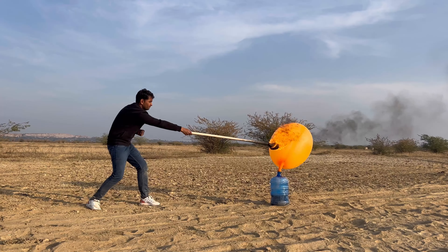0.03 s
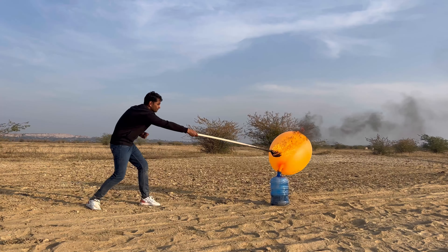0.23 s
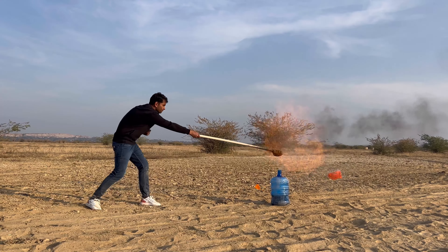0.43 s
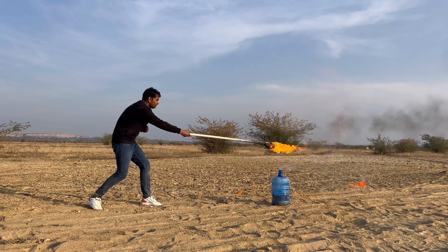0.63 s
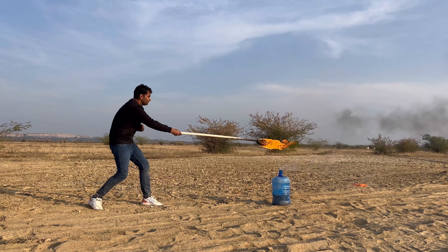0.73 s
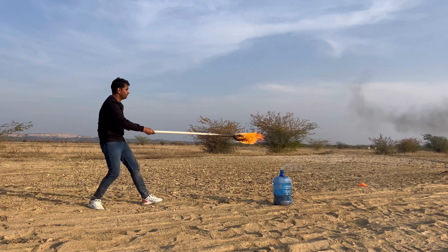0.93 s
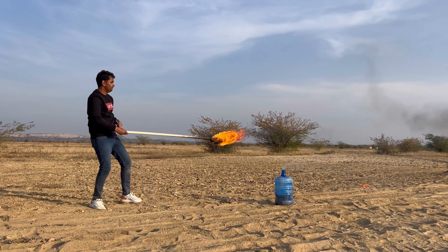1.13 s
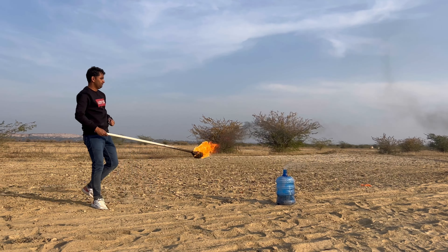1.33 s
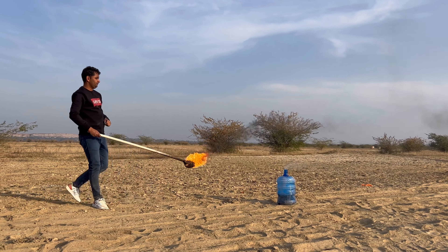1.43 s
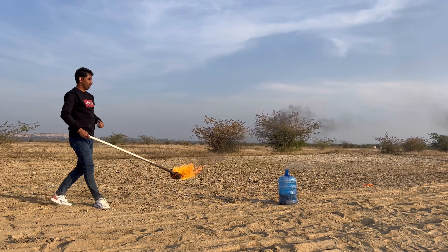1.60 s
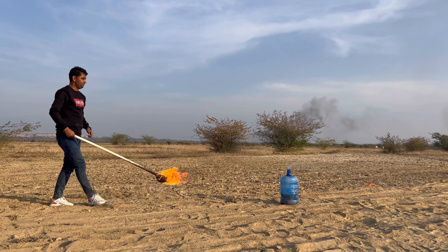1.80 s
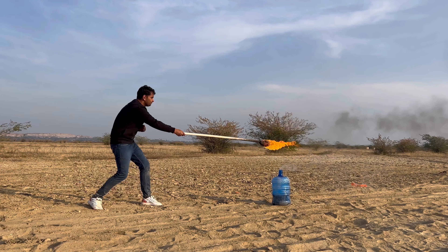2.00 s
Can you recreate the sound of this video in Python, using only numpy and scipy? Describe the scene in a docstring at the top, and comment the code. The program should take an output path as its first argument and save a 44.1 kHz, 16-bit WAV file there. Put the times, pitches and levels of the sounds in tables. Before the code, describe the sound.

A hydrogen balloon explodes with a sharp crack and short, deep boom in an open field, without echo. After a brief hush, a swung torch flame rushes and flaps, then stops, leaving low wind on the microphone.

```python
"""First comes the faint flutter of a torch flame on a pole in an open field. A quarter second in, it sets off a
hydrogen balloon: the bursting gas gives a ragged crack and the growing fireball a short, deep boom, with no
distant echo. After a brief hush the flame rushes and flaps as it is swung away, with a few dry ticks. At the
end, with a click, the scene changes to low wind."""
import sys
import numpy as np
from scipy import signal
from scipy.io import wavfile
from scipy.ndimage import uniform_filter1d, minimum_filter1d

SR = 44100
rng = np.random.default_rng(int(sys.argv[2]) if len(sys.argv) > 2 else 0)


def unload_audio(sound):
    """Save the sound as a 16-bit wav file, at the path given as the first command line argument."""
    columns = np.transpose(np.atleast_2d(sound))
    # keep every value between -1 and 1, then stretch to whole-number steps
    steps = np.round(np.clip(columns, -1, 1) * 32767)
    wavfile.write(sys.argv[1], SR, steps.astype(np.int16))


N = 90669
TIME = np.arange(N) / SR
BANG_S, FLAME_END_S = 0.252, 1.988

# How loud each layer of the flame is over time. Each row: time in seconds, level in dB.
RUMBLE_LEVEL = [(0, -43.5), (.1, -41), (.15, -50), (.24, -46), (.42, -45.5), (.5, -41), (.58, -28.5),
                (.82, -27.5), (.94, -36.5), (1.03, -30.5), (1.14, -30.5), (1.33, -28), (1.42, -33.5),
                (1.48, -45.5), (1.63, -33.5), (1.72, -42.5), (1.98, -41)]
ROAR_LEVEL = [(0, -53), (.22, -54), (.32, -52.5), (.4, -72.5), (.52, -65), (.62, -36.5), (.72, -45.5),
              (.95, -57.5), (1.04, -40.5), (1.14, -50), (1.27, -43), (1.335, -34), (1.42, -46.5),
              (1.52, -51.5), (1.63, -42), (1.73, -49.5), (1.82, -46), (1.98, -48.5)]
RUSH_LEVEL = [(0, -70), (.22, -61.5), (.28, -54.5), (.35, -78.5), (.48, -77.5), (.58, -54.5), (.63, -52.5),
              (1.35, -54), (1.55, -55), (1.98, -54.5)]
HISS_LEVEL = [(0, -104), (.24, -88), (.5, -85.5), (.58, -71.5), (.65, -65.5), (.97, -76.5), (1.12, -72),
              (1.38, -73), (1.7, -74.5), (1.95, -99)]
# The tone colour of each noise. Each row: frequency in Hz, relative strength there in dB.
RUMBLE_COLOUR = [(25, -25), (45, -0.5), (72, 2.5), (110, -1), (170, -11.5), (240, -15), (340, -38.5)]
ROAR_COLOUR = [(190, -1), (260, -1), (410, -6.5), (520, -19), (700, -26)]
RUSH_COLOUR = [(450, 0.5), (620, 0), (900, -2), (1400, -2.5), (1800, -17), (2250, -18.5), (2850, -20),
               (4500, -36.5)]
SIZZLE_COLOUR = [(10000, 0), (15500, 0)]
HISS_COLOUR = [(2500, -1), (3700, -2.5), (5500, -3.5), (7500, -14), (9500, -23), (15500, -22)]
AIR_COLOUR = [(2000, 6.5), (5000, -2.5), (15500, -9.5)]
CRACK_COLOUR = [(150, -0.5), (380, 2.5), (550, -11), (1100, -21.5), (1750, -19), (2700, -25), (4200, -21.5),
                (6300, -44), (7600, -27), (10000, -44.5), (15500, -38)]
SCATTER_COLOUR = [(100, 0.5), (380, -4.5), (600, -18), (1200, -30), (2200, -39), (4200, -45),
                  (15500, -53.5)]
PUFF_COLOUR = [(200, 12), (400, 1.5), (600, 4), (850, -6), (1150, -22.5), (1700, -27.5), (2400, -41)]
WIND_COLOUR = [(18, 8.5), (50, -10.5), (100, -33), (250, -31), (600, -49.5), (1800, -82.5)]
# How noise spreads between the ears. Each row: frequency in Hz, left minus right in dB,
# how alike the two sides are (1 means the same).
FLAME_STEREO = [(700, 0.5, 1), (900, 0, 0.98), (1340, 4.5, 0.35), (2270, -1.5, 0.39), (4400, 4, 0.75),
                (8000, 0.5, 0.41), (11000, 0, .05)]
CRACK_STEREO = [(500, 1, 1), (690, -6.5, 0.92), (1290, -3.5, 0.48), (2400, -0.5, 0.96), (4380, 3.5, 0.24),
                (8100, 0, 0.04), (15000, -1.5, 0.26)]
# Narrow bands that drone in the rush. Each row: low and high edge in Hz, dB relative to the rush.
DRONES = [(1214, 1393, -5.5), (2030, 2350, -16.5), (3420, 3850, -27)]
# Flame pops. Each row: time in seconds, pitch in Hz, level in dB, half-width in seconds.
POPS = [(0.2415, 890, -40.5, 0.0055), (1.0555, 390, -27.5, 0.0029), (1.0603, 786, -26, 0.0017),
        (1.0602, 1400, -43.5, 0.0011)]
# Shock waves of the bursting gas. Each row: start in seconds, level in dB, length in seconds.
SHOCKS = [(0.2544, -6.5, 0.0032), (0.2604, -9, 0.0049)]
# The hollow ring of the burst. Each row: pitch in Hz, level in dB.
RING_TONES = [(555, -20.5), (664, -23), (866, -24.5), (1004, -30.5), (1123, -21), (1385, -29),
              (1703, -23.5), (2126, -31), (2520, -34)]
# The boom's low tones. Each row: pitch in Hz, level in dB, then rise, hold and fade in seconds.
BOOM_TONES = [(83.2, -4.5, 0.028, 0.061, 0.056), (180.5, -12, 0.014, 0.041, 0.075),
              (231.8, -14.5, 0.014, 0.042, 0.052), (305.9, -12, 0.0023, 0.019, 0.094),
              (408, -15.5, 0.0062, 0.015, 0.098)]
# Small ticks; the last is the click where the scene changes. Each row: start in seconds, level in dB before
# filtering, top frequency in Hz.
TICKS = [(0.67, -46, 9000), (1.038, -46, 4000), (1.959, -38.5, 9100), (1.9863, -23.5, 3020)]
# Flame flaps. Each row: start in seconds, level in dB, pitch in Hz, fade in seconds.
FLAPS = [(0.674, -21.5, 52.2, 1), (0.757, -23, 63.8, 0.49), (1.058, -10, 98, 0.04), (1.08, -16, 75, 0.082),
         (1.097, -16, 133.5, 0.052), (1.178, -18, 98.3, .12), (1.317, -22.5, 236, 0.09),
         (1.499, -29, 85.5, 0.22), (1.635, -22, 67.5, 0.076), (1.742, -28, 110, 0.072),
         (1.791, -26, 107, 0.053), (1.889, -30.5, 69.7, 0.28)]
# Flame puffs. Each row: time in seconds, level in dB, half-width in seconds.
PUFFS = [(1.038, -35, 0.0017), (1.063, -31, 0.0062), (1.328, -34.5, 0.0034), (1.353, -34, 0.0033),
         (1.363, -31.5, 0.0026), (1.388, -33.5, 0.0035)]


def from_db(db):
    """Turns decibels into a gain to multiply by."""
    return 10 ** (np.asarray(db) / 20)


def level(rows):
    """Gain over time from a table of levels."""
    return from_db(np.interp(TIME, *np.transpose(rows)))


def at_hz(rows, hz):
    """Looks up a table's values at one frequency."""
    freqs, *columns = np.transpose(rows)
    return [np.interp(np.log(hz), np.log(freqs), column) for column in columns]


def keep_band(sound, kind, hz, order=2):
    """Keeps the lows, the highs or a band between; a higher order cuts more sharply."""
    return signal.sosfilt(signal.butter(order, hz, kind, fs=SR, output="sos"), sound + 1e-18)


def drift(rate_hz):
    """A slow random wobble, about 1 in size."""
    step = 40  # samples between wobble points
    pole = np.exp(-2 * np.pi * rate_hz * step / SR)
    slow = signal.lfilter([1], [1, -2 * pole, pole ** 2], rng.standard_normal(N // step + 2002))[2000:]
    return np.interp(np.arange(N) / step, np.arange(len(slow)), slow / slow.std())


def noise(colour, stereo=FLAME_STEREO, flicker_db=0, steady_s=0):
    """Stereo noise of strength 1, built from bands that can each be evened out and made to flicker."""
    edges = 12.5 * 2 ** (np.arange(33) / 3)  # three bands per octave
    sides = np.array([[1], [-1]])
    total, white = 0, rng.standard_normal((2, 2, N + SR // 4))
    for k, (low, high) in enumerate(zip(edges, edges[1:])):
        hz = np.sqrt(low * high)
        if not colour[0][0] / np.sqrt(2) < hz < colour[-1][0] * np.sqrt(2):
            continue
        band = keep_band(white[k % 2], "band", [low, high])[:, -N:]
        if steady_s:
            power = uniform_filter1d(band ** 2, int(SR * max(steady_s, 2 / hz)))
            band = band * band.std() / np.sqrt(power + 1e-18)
        pan_db, alike = at_hz(stereo, hz)
        pair = np.sqrt(1 + alike) * band[0] + np.sqrt(1 - alike) * band[1] * sides
        gain = from_db(at_hz(colour, hz)[0] + (flicker_db * drift(15) if flicker_db else 0))
        total = total + gain * from_db(sides * pan_db / 2) * pair
    return total / total.std()


def envelope(start, rise, hold, fade):
    """Rises, holds until `hold` seconds after the start, then drops 60 dB every `fade` seconds."""
    age = TIME - start
    rising = np.sin(np.clip(age / rise, 0, 1) * np.pi / 2) ** 2
    return rising * from_db(-60 * np.clip((age - hold) / fade, 0, 10))


def swell(start, hz, db, rise, hold, fade):
    """A short tone: a mass of air heaves back and forth."""
    return from_db(db) * envelope(start, rise, hold, fade) * np.sin(2 * np.pi * hz * (TIME - start))


def bump(time, db, half_width):
    """A brief bell-shaped rise and fall."""
    return from_db(db) * np.exp(-((TIME - time) / half_width) ** 2)


def torch_flame():
    """The flame burns with a fluttering rumble, a hollow roar and a smooth, hissing rush."""
    flutter = from_db(-0.5 + 1.8 * drift(rate_hz=20))
    rumble = level(RUMBLE_LEVEL) * flutter * noise(RUMBLE_COLOUR, flicker_db=0.5, steady_s=0.04)
    roar = level(ROAR_LEVEL) * noise(ROAR_COLOUR, flicker_db=2, steady_s=0.04)
    rush = noise(RUSH_COLOUR, flicker_db=0.66) + from_db(-34) * noise(SIZZLE_COLOUR)
    rush = level(RUSH_LEVEL) * rush + level(HISS_LEVEL) * noise(HISS_COLOUR, flicker_db=1.5)
    rush += 0.14 * np.roll(rush, round(0.0008 * SR), axis=1)  # its bounce off the ground
    for low, high, db in DRONES:
        white = rng.standard_normal((2, N)) + 0.91 * rng.standard_normal(N)  # partly shared by both ears
        drone = keep_band(white, "band", [low, high])
        rush += level(RUSH_LEVEL) * from_db(db) * drone / drone.std()
    return rumble + roar + rush


def air():
    """A very faint, steady hiss behind everything."""
    return from_db(-87) * noise(AIR_COLOUR)


def flame_pops():
    """Hollow pops as the flame catches or tears."""
    return sum(bump(time, db, half_width) * np.cos(2 * np.pi * hz * (TIME - time))
               for time, hz, db, half_width in POPS)


def balloon_crack():
    """The gas bursts with a tearing crack and a hollow ring, and the rough ground scatters the sound."""
    crack = from_db(-15.5) * noise(CRACK_COLOUR, CRACK_STEREO, steady_s=0.026)
    crack *= envelope(BANG_S - 0.0025, rise=0.005, hold=0.017, fade=0.026)
    # A bright reflection follows too closely to be heard on its own.
    reflection = from_db(-14.5) * keep_band(np.roll(crack, int(0.0096 * SR), axis=1), "high", 1890)
    ring = sum(swell(BANG_S + rng.random() / hz, hz, db, rise=0.0044, hold=0.01, fade=0.04)
               for hz, db in RING_TONES)
    late_ring = np.interp(TIME - 0.00008, TIME, ring)
    ring = np.array([from_db(-3) * late_ring, from_db(3) * ring])  # later and softer on the left
    scatter = from_db(-13) * noise(SCATTER_COLOUR, CRACK_STEREO, steady_s=0.055)
    scatter *= envelope(BANG_S, rise=0.017, hold=0.017, fade=0.11)
    return crack + reflection + ring + scatter


def fireball_boom():
    """Low tones swell, along with a thump that sinks in pitch as the ball of hot gas grows."""
    start_hz, halving_s = 271.5, 0.03596
    hz = start_hz * 2 ** (-np.clip(TIME - BANG_S, 0, 1) / halving_s)
    tone = np.sin(2 * np.pi * np.cumsum(hz * (TIME > BANG_S)) / SR)
    thump = from_db(-7) * envelope(BANG_S, rise=0.026, hold=0.055, fade=0.07) * tone
    return thump + sum(swell(BANG_S, *row) for row in BOOM_TONES)


def shock_waves():
    """In each shock the air pressure jumps, slides through zero and snaps back."""
    pressure = np.zeros(N)
    for start, db, length in SHOCKS:
        passing = (TIME > start) & (TIME < start + length)
        pressure += from_db(db) * (2 * (TIME - start) / length - 1) * passing
    return keep_band(pressure, "low", 1560, order=1)


def ticks():
    """Small dry ticks, some duller than others, and a click where the scene changes."""
    total, white = 0, rng.standard_normal((2, N))
    for start, db, top_hz in TICKS:
        burst = from_db(db) * envelope(start, rise=0.0006, hold=0, fade=0.0049) * white
        total = total + keep_band(burst, "band", [1500, top_hz], order=1)
    return total


def flame_flaps():
    """The swung flame flaps in low thuds and short puffs of noise."""
    flaps = sum(swell(start, hz, db, rise=0.0047, hold=0.0047, fade=fade)
                for start, db, hz, fade in FLAPS)
    puffs = noise(PUFF_COLOUR, steady_s=0.0024) * sum(bump(*row) for row in PUFFS)
    return flaps + puffs


def wind():
    """Low wind rumbles on the microphone once the scene changes."""
    onset = envelope(FLAME_END_S, rise=0.024, hold=1, fade=1)
    return from_db(-22) * noise(WIND_COLOUR, steady_s=0.07) * onset


def scene():
    """Adds up the explosion, the torch and the sounds around them."""
    explosion = balloon_crack() + fireball_boom() + shock_waves()
    torch = torch_flame() + flame_pops() + flame_flaps()
    torch *= 1 - np.clip((TIME - FLAME_END_S) / 0.002, 0, 1)  # the scene changes here
    return explosion + torch + ticks() + wind() + air()


def record(dry):
    """Centres the bass, briefly turns down the loudest peaks and cuts the highest treble."""
    bass_cut = signal.butter(3, 740, "high", fs=SR, output="sos")
    side = signal.sosfiltfilt(bass_cut, (dry[0] - dry[1]) / 2)
    mix = dry.mean(axis=0) + np.array([side, -side])
    ceiling, span = 0.92, int(0.004 * SR)
    gain = np.minimum(1, ceiling / (np.abs(mix).max(axis=0) + 1e-9))
    gain = uniform_filter1d(minimum_filter1d(gain, span), span)
    treble_cut = signal.ellip(10, 0.1, 80, 16200, fs=SR, output="sos")
    return signal.sosfilt(treble_cut, mix * gain)


dry = scene()
out = record(dry)
unload_audio(out)
```